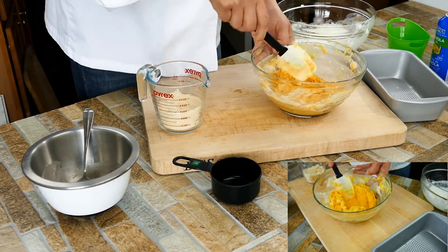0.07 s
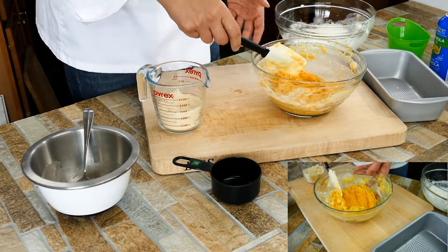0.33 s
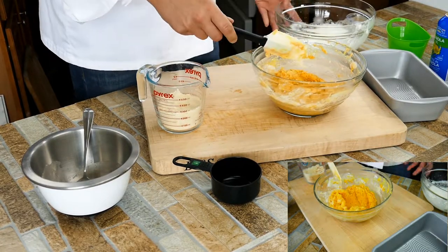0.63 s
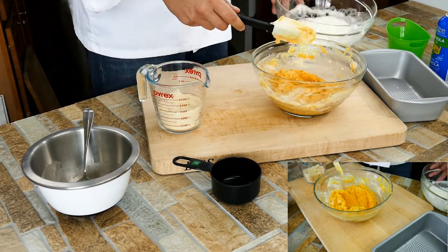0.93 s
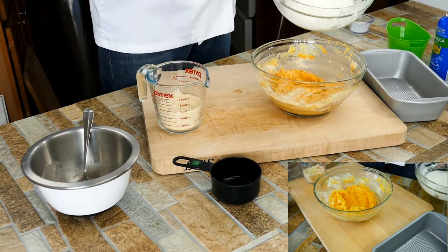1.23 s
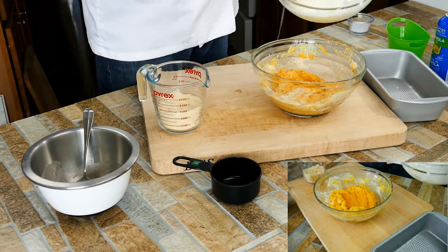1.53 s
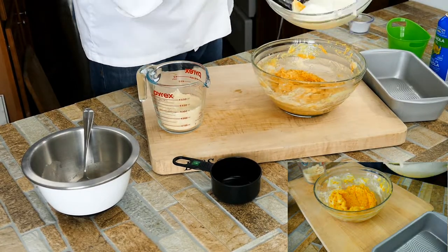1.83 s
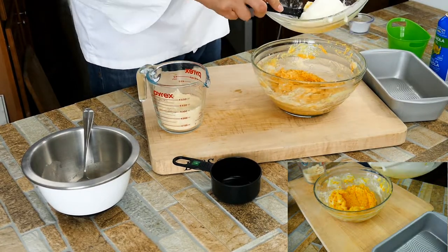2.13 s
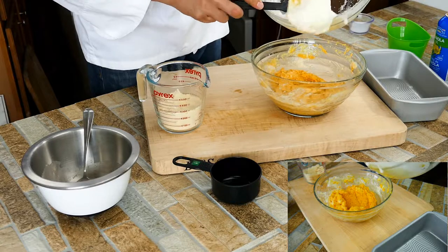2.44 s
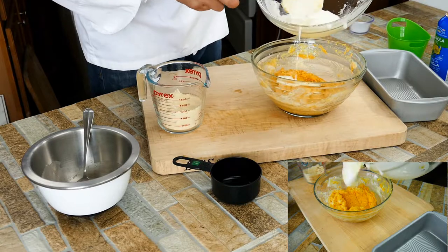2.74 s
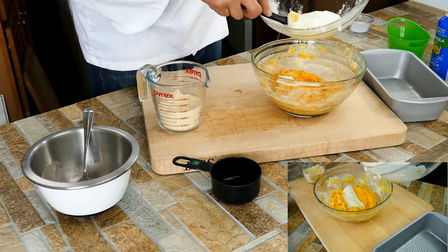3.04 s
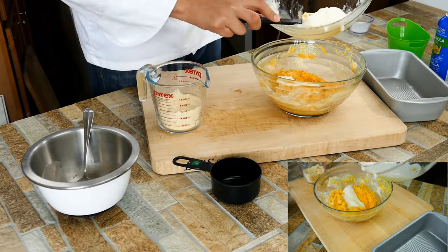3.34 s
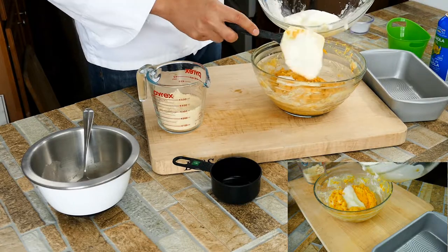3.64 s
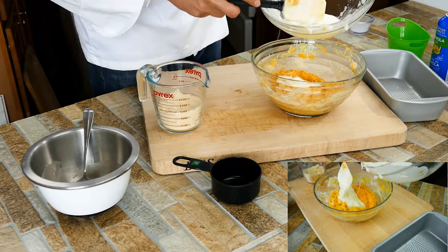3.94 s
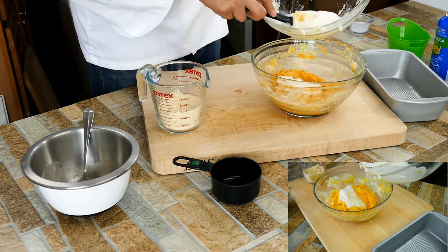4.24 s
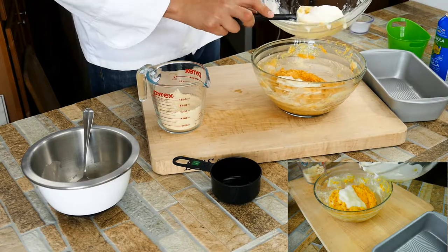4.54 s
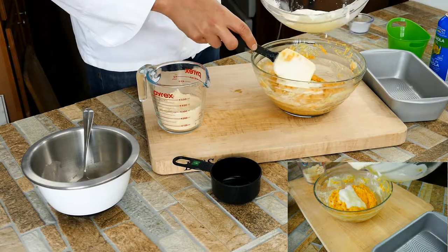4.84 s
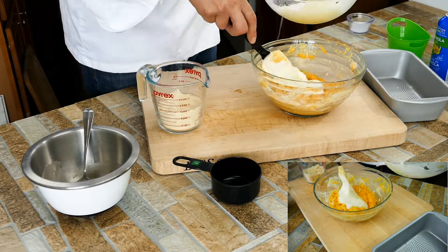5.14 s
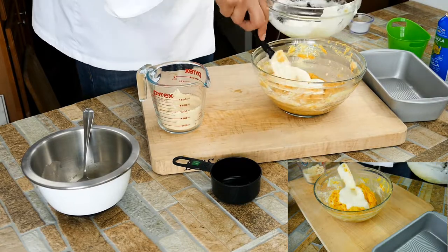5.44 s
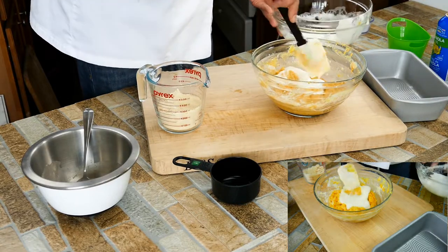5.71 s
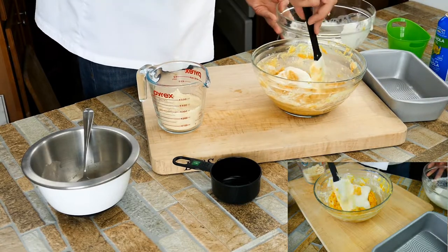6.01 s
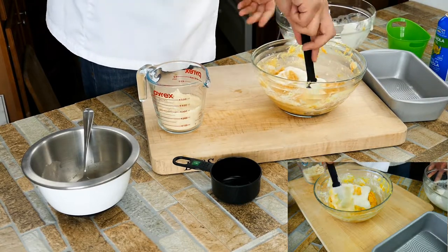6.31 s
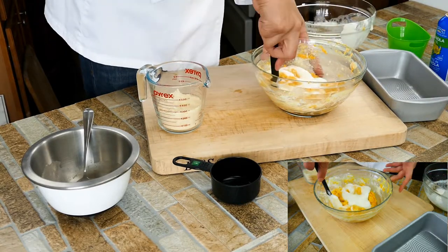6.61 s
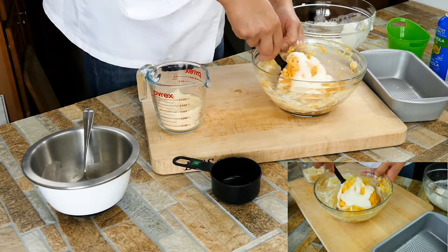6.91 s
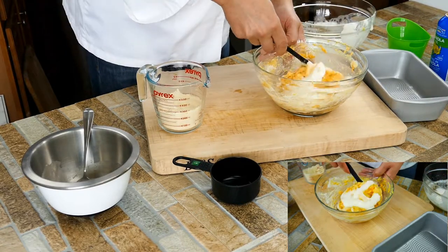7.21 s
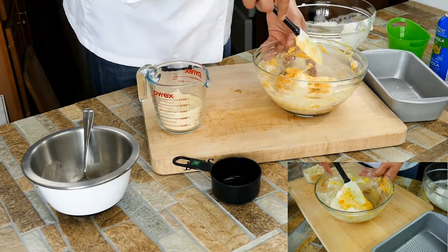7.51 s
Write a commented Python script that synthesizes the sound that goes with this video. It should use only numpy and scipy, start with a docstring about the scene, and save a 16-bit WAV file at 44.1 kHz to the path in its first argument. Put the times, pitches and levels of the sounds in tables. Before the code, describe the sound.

A low appliance hum with a soft rush of air runs throughout in a small, echoing kitchen. In the first second a spatula gives a faint, dull knock and smears softly through thick cream. A glass bowl drags briefly on the counter at 0.8 seconds, followed by soft handling bumps and a sharp, ringing clink at 1.4 seconds. From about 1.7 to 2.7 seconds come a light tap, short rubs on the glass and wet smears. A clink and a hollow knock sound near 3 seconds, then a cluster of ringing knocks, a clink and a rub between 3.9 and 4.4. Faint smears follow. At 5.9 seconds the bowl hits the counter with a bump, the loudest sound, whose echo lingers briefly. From 6.4 to about 7.5 seconds, wet batter is folded quietly with tiny popping air pockets.

```python
"""An appliance hums all the while in a small, live kitchen. A spatula knocks dully on a glass bowl
and smears through thick cream. The cook lifts the bowl, which drags briefly on the counter.
As the cream is scraped out, the spatula clinks, rubs and knocks on the glass and makes it ring.
The bowl is set down with a loud bump whose echo lingers briefly, then dies away. Last, the spatula
folds wet batter in a second bowl, and little air pockets pop."""
import sys
import numpy as np
from scipy import signal
from scipy.fft import rfft, irfft, next_fast_len
from scipy.io import wavfile

SR = 44100
rng = np.random.default_rng(int(sys.argv[2]) if len(sys.argv) > 2 else 0)


def unload_audio(sound):
    """Save the sound as a 16-bit wav file, at the path given as the first command line argument."""
    columns = np.transpose(np.atleast_2d(sound))
    # keep every value between -1 and 1, then stretch to whole-number steps
    steps = np.round(np.clip(columns, -1, 1) * 32767)
    wavfile.write(sys.argv[1], SR, steps.astype(np.int16))


N = 337806
TIME = np.arange(N) / SR
HIT_TIME = TIME[:SR]  # one second, the space given to each blow

# Levels in the tables are relative. A fade time is how long a sound takes to drop by 60 dB.
# The kitchen's echo. Each row: frequency in Hz, fade time in seconds.
ROOM_FADE = [(100, 1), (400, 0.48), (750, 0.61), (1500, 0.45), (4000, 0.44), (8000, 0.48), (14000, 0.17)]
# How alike left and right are. Each row: frequency in Hz, likeness (1 means the same).
EAR_LIKENESS = [(50, 0.97), (300, 0.99), (600, 0.88), (1200, 0.65), (4000, 0.75), (8000, 0.66),
                (13000, 0.4)]
# The motor's tones. Each row: pitch in Hz, level in dB.
MOTOR_TONES = [(119.6, -57), (139.6, -56.5)]
# The rush of air. Each row: frequency in Hz, level in dB.
AIR_COLOUR = [(25, -64), (60, -21), (90, -19), (130, -2.5), (170, -10), (250, -9), (450, -5), (740, -8),
              (1000, -14), (1900, -20.5), (2300, -25), (5000, -31), (10000, -39), (15300, -51.5)]
# Pitches that stand out of the rush. Each row: centre in Hz, width in Hz, boost in dB.
AIR_PEAKS = [(257.5, 41, 6.5), (406, 51, 4), (744.6, 8.2, 9.5), (1930, 32, 7.5)]
# Knocks on the rim. Each row: start in seconds, knock level in dB, ring level in dB,
# tilt towards treble in dB per octave, seconds until the ring drops away.
KNOCKS = [(.160, -44, -53, -12.5, 0.033), (2.964, -30.5, -35.5, -1.5, 0.094),
          (3.929, -23.5, -24, 0.5, 0.13), (4.2292, -29.5, -30.5, 0, 0.068), (4.3173, -32.5, -38, 0.5, 0.13)]
# The hollow sound of a knock. Each row: frequency in Hz, level in dB.
KNOCK_COLOUR = [(50, -48), (110, -41), (210, -9.5), (400, -4.5), (750, -5.5), (1250, -3.5), (1900, -7),
                (2300, -14.5), (2650, -6.5), (3000, -27), (4400, -37), (7000, -31), (10000, -33),
                (15000, -57)]
# Pitches that stand out of a knock. Each row: centre in Hz, width in Hz, boost in dB.
KNOCK_PEAKS = [(482.5, 5.6, 15.5), (653, 140, 12), (760, 36, 14.5), (1125, 83, 2), (1280, 135, 11.5),
               (1686, 49, 3), (1865, 67, 11.5), (3710, 99, 24.5), (4740, 120, 23), (6150, 510, 9.5),
               (7360, 180, 8), (8600, 180, 7), (10200, 250, 6), (11200, 200, 7), (12600, 200, 7)]
# The rim's ringing tones. Each row: pitch in Hz, level in dB, fade time in seconds.
RIM_TONES = [(1081, -1, 0.46), (1245, -1, 0.33), (1714, -5.5, 0.28), (2590, -6, 8.7), (2664, -5.5, 0.15),
             (3690, -24, 0.89), (4940, -23.5, 0.25), (6000, -22.5, 0.33), (7580, -28, 0.32),
             (9970, -26, 0.1)]
# Strokes through cream and batter. Each row: firmest moment in seconds, length in seconds,
# level in dB, extra fizz in dB.
SMEARS = [(.17, .17, -49.5, -10.5), (.41, .09, -57.5, -13), (0.676, .1, -51, -7.5),
          (0.78, 0.05, -54.5, 5.5), (1.092, .08, -49.5, -12), (2.364, 0.072, -57, -9),
          (2.643, .045, -43, -12), (4.816, 0.027, -55, -3), (5.06, 0.13, -61, -7),
          (5.382, 0.058, -54, -6.5), (6.452, 0.17, -53, -6), (6.577, 0.041, -51, -15),
          (6.66, 0.11, -53.5, -10), (6.88, 0.2, -51.5, -7), (7.178, 0.29, -63.5, 10),
          (7.4, 0.095, -61.5, 8)]
# The body of a smear, then its high fizz. Each row: frequency in Hz, level in dB.
SMEAR_COLOUR = [(600, -1), (1500, 6), (3000, 3), (5000, -2.5), (8000, -9), (15000, -22)]
FIZZ_COLOUR = [(3000, 1.5), (6500, 6), (10300, 2.5), (12500, -8), (15000, -17)]
# The bowl sliding on the counter. Each row: frequency in Hz, level in dB.
DRAG_COLOUR = [(60, -50), (110, -13), (250, -9), (350, -2.5), (480, -1), (620, -10), (760, -6.5),
               (920, -14), (1100, -9.5), (1700, -21.5), (2400, -23), (5400, -32), (9000, -50), (15000, -67)]
# Pitches that stand out of the slide. Each row: centre in Hz, width in Hz, boost in dB.
DRAG_PEAKS = [(348, 38, 5), (760, 23, 11.5), (1070, 70, 1), (1390, 69, 7), (2340, 120, 7.5), (5540, 96, 2),
              (6800, 160, 12), (8900, 160, 3), (10150, 160, 10)]
# Soft bumps of the hand on the bowl. Each row: start in seconds, level in dB, length in seconds.
HAND_BUMPS = [(1.256, -44.5, 0.06), (1.302, -46.5, 0.053)]
# Air pockets popping. Each row: start in seconds, level in dB, centre in Hz.
POPS = [(1.06, -53, 2790), (2.627, -57, 3600), (4.7955, -54.5, 9500), (6.370, -61, 9800), (6.57, -55, 2560),
        (6.650, -48, 3130), (6.668, -50.5, 2820), (7.160, -55, 10300), (7.279, -54, 9550),
        (7.361, -53, 4280)]
# Clinks on the held bowl. Each row: start in seconds, level in dB, tilt towards treble in dB
# per octave, boost of the bright tones in dB, clatter level in dB.
CLINKS = [(1.434, -18.5, -0.97, -0.5, -4.5), (1.74, -41.5, 0.4, 6.5, 2.5), (2.9358, -27, 0, 5, 4.5),
          (4.157, -27, 0, 2.5, 0)]
# The held bowl's ringing tones. Each row: pitch in Hz, level in dB, fade time in seconds.
GLASS_TONES = [(382.3, -6, 0.31), (891, -2.5, 0.37), (946, -1.5, 0.48), (1090, -7, 0.47), (1660, 3, 0.37),
               (2514, -6, 0.33), (2560, 2, 0.31), (3520, -7.5, 0.51), (3570, 1.5, .3), (4643, -4, 0.35),
               (5860, -9.5, 0.27), (6450, -37, 0.18), (6890, -19, 0.25), (7160, -9, 0.29),
               (7730, -23, 0.24), (8620, -13.5, 0.32), (9700, -27, 0.26), (10100, -20.5, 0.26),
               (10400, -45, 0.21), (11660, -27, 0.25), (12410, -40, .25)]
# A clink's first crack, then its clatter. Each row: frequency in Hz, level in dB.
CRACK_COLOUR = [(200, -23), (1000, -3), (2000, -3.5), (2800, 8.5), (3600, -12), (4600, -19), (7000, -12),
                (12000, -28), (15000, -45)]
CLATTER_COLOUR = [(60, -24), (200, -9.5), (400, -2), (1100, -1.5), (2000, -9), (3200, -9.5), (4200, -12),
                  (7000, -20), (10000, -28), (15000, -57)]
# Rubs along the glass. Each row: firmest moment in seconds, length in seconds, level in dB,
# favoured pitch in Hz.
RUBS = [(1.888, .04, -49, 2480), (1.986, 0.13, -59.5, 3430), (2.226, 0.037, -41, 980),
        (2.252, 0.031, -47.5, 3500), (2.28, 0.022, -47, 1660), (3.239, 0.15, -56, 2870),
        (4.346, 0.086, -38.5, 1670)]
# The bowl hitting the counter. Each row: start in seconds, level in dB, decay in seconds,
# tilt towards treble in dB per octave.
LANDING_HITS = [(5.8704, -10, 0.018, 2), (5.8769, -3, 0.0019, -3.5)]
# The thud of the counter. Each row: frequency in Hz, level in dB.
COUNTER_COLOUR = [(30, -57), (60, -24), (90, -44), (133, -9), (180, -12.5), (320, -6.5), (420, -8),
                  (700, -2), (1100, -7.5), (2400, -18.5), (4000, -28.5), (7000, -39), (10500, -52.5),
                  (15000, -74)]
# Where bowl and counter ring together. Each row: centre in Hz, width in Hz, boost in dB.
COUNTER_PEAKS = [(139, 11, -2.5), (336, 34, 2.5), (587, 15, 5), (710, 46, 5.5), (805, 25, 8.5),
                 (1420, 90, 7.5), (1740, 89, 4.5), (2380, 130, 7.5), (2710, 55, 6.5), (2930, 62, 6),
                 (3870, 42, 9), (4610, 29, 11)]
# The microphone's tone. Each row: frequency in Hz, boost or cut in dB.
MICROPHONE = [(30, -20), (55, -2.5), (85, 0), (110, -0.5), (7400, 0.5), (8200, -2.5), (9000, 2.5),
              (13000, 5), (15500, 3)]


def amp(db):
    """Turns decibels into a number to multiply by."""
    return 10 ** (np.asarray(db) / 20)


def unit(x):
    """Scales a signal to an average strength (rms) of 1."""
    return x / np.sqrt(np.mean(x ** 2) + 1e-20)


def read(points, hz):
    """Reads between a table's rows, with the frequencies spaced by octaves."""
    f, value = np.transpose(points)
    return np.interp(np.log(hz + 1), np.log(f + 1), value)


def add(mix, s, sound):
    """Mixes a sound in, starting at s seconds."""
    part = mix[:, round(s * SR):][:, :sound.shape[-1]]
    part += sound[..., :part.shape[1]]


def colour(points, peaks=()):
    """How strong each frequency is: a smooth curve with peaks on top."""
    def gain(hz):
        lift = sum((amp(db) ** 2 - 1) / (1 + (2 * (hz - f) / w) ** 2) for f, w, db in peaks)
        return amp(read(points, hz)) * np.sqrt(np.maximum(1 + lift, 1))
    return gain


def tilted(gain, tilt_db):
    """Tips a colour towards the treble by tilt_db an octave, pivoting near 1000 Hz."""
    return lambda hz: gain(hz) * amp(tilt_db * np.log2((hz + 50) / 1000))


def shape(x, gain):
    """Gives a sound a colour, without letting anything sound before its cause."""
    size = 2 * next_fast_len(x.shape[-1] // 2 + 2048)
    hz = np.fft.rfftfreq(size, 1 / SR)
    cepstrum = irfft(np.log(np.maximum(gain(hz), 1e-5)))
    cepstrum[1:size // 2] *= 2  # fold the filter's early half onto its late half
    cepstrum[size // 2 + 1:] = 0
    return irfft(rfft(x, size) * np.exp(rfft(cepstrum)), size)[..., :x.shape[-1]]


def spread(pair, gain):
    """Colours two unrelated signals and blends them into a partly alike left and right."""
    mid = shape(pair[0], lambda hz: gain(hz) * np.sqrt(1 + read(EAR_LIKENESS, hz)))
    side = shape(pair[1], lambda hz: gain(hz) * np.sqrt(1 - read(EAR_LIKENESS, hz)))
    return unit(np.array([mid + side, mid - side]))


def noise(gain, size):
    """Stereo noise with a given colour."""
    return spread(rng.standard_normal((2, size)), gain)


def wander(rate_hz, size):
    """A smooth random wobble; a higher rate makes it quicker."""
    hz = np.fft.rfftfreq(size, 1 / SR)
    return unit(irfft(rfft(rng.standard_normal(size)) * np.exp(-(hz / rate_hz) ** 2), size))


def appliance(rush_db=-46.5):
    """Two motor tones beat against each other over a steady rush of air."""
    hum = np.zeros(N)
    for hz, db in MOTOR_TONES:
        drift = .15 * wander(3, N)
        hum += amp(db) * np.sqrt(2) * np.sin(2 * np.pi * hz * TIME + drift)
    air = colour(AIR_COLOUR, AIR_PEAKS)
    rumble_cut = colour([(60, 0), (100, -7), (145, -7), (200, 0)])
    return hum + amp(rush_db) * noise(lambda hz: air(hz) * rumble_cut(hz), N)


def crack(gain):
    """The first few milliseconds of a blow, straight from the glass."""
    burst = rng.standard_normal((2, SR)) * np.exp(-HIT_TIME / .002)
    return spread(burst, gain) * np.sqrt(.001)


def echoes(gain, hold_s=0):
    """The crowded echoes of one blow; after the hold, each frequency dies at the room's speed."""
    hz, t, bands = signal.stft(noise(gain, SR), SR, nperseg=256)
    fade = amp(-60 * np.maximum(t - hold_s, 0) / read(ROOM_FADE, hz)[:, None])
    tail = signal.istft(bands * fade, SR, nperseg=256)[1][:, :SR]
    return tail * (1 - np.exp(-HIT_TIME / 0.00017))


def ring(tones, waver):
    """Dying tones of glass; echoes make each one waver and reach the two ears out of step."""
    out = np.zeros((2, SR))
    for hz, db, fade_s in tones:
        phase = 2 * np.pi * rng.random() + 0.36 * rng.standard_normal((2, 1))
        flutter = 1 + waver * (wander(32, SR) + 1j * wander(62, SR))
        tone = np.exp(1j * (2 * np.pi * hz * HIT_TIME + phase))
        out += amp(db - 60 * HIT_TIME / fade_s) * (flutter * tone).real
    return out * (1 - np.exp(-HIT_TIME / 0.0013))


def knocks(crack_db=5, drop_db=14, drop_s=0.031, fade_db_per_s=90):
    """The spatula gives a hollow knock; the rim sings on briefly, then drops away quickly."""
    out = np.zeros((2, N))
    early_boost = 1 + amp(-2) * np.exp(-HIT_TIME / 0.05)
    for s, knock_db, ring_db, tilt_db, sing_s in KNOCKS:
        body = tilted(colour(KNOCK_COLOUR, KNOCK_PEAKS), tilt_db)
        knock = echoes(body) * early_boost + amp(crack_db) * crack(body)
        late_s = np.maximum(HIT_TIME - sing_s, 0)
        loss_db = drop_db * (1 - np.exp(-late_s / drop_s)) + fade_db_per_s * late_s
        add(out, s, amp(knock_db) * knock + amp(ring_db - loss_db) * ring(RIM_TONES, waver=0.41))
    return out * amp([[-0.23], [0.23]])  # left, right


def swell(s, attack_s, hold_s, release_s):
    """A loudness curve that grows up to time s, holds, then dies away."""
    early, late = np.maximum(s - TIME, 0), np.maximum(TIME - s - hold_s, 0)
    return np.exp(-np.minimum(early / attack_s + late / release_s, 30))


def stroke(s, length):
    """The pressure of one stroke of the spatula."""
    return swell(s, attack_s=0.49 * length, hold_s=0.21 * length, release_s=0.76 * length)


def crackle(gain, per_s, uneven_db):
    """Countless tiny wet snaps of uneven size."""
    sizes = amp(uneven_db * np.minimum(rng.exponential(1, (2, N)), 4)) * rng.standard_normal((2, N))
    snaps = rng.random((2, N)) < per_s / SR
    return spread(sizes * snaps, gain)


def smears(body_db=-3, fizz_db=-2.5, lumps_db=2):
    """Cream and batter smear and tear in lumps under the blade."""
    body = crackle(colour(SMEAR_COLOUR), per_s=4600, uneven_db=0)
    body *= amp(body_db + lumps_db * wander(30, N))
    fizz = crackle(colour(FIZZ_COLOUR), per_s=7000, uneven_db=2)
    fizz *= amp(fizz_db + lumps_db * wander(50, N))
    body_power, fizz_power = np.zeros((2, N))
    for s, length, db, extra_fizz_db in SMEARS:
        power = (amp(db) * stroke(s, length)) ** 2
        body_power += power
        fizz_power += power * amp(extra_fizz_db) ** 2
    return body * np.sqrt(body_power) + fizz * np.sqrt(fizz_power)


def lifting(drag_s=0.7734, drag_db=-29.5):
    """The bowl's foot slides over the counter; low bumps follow as it is taken in hand."""
    slide = swell(drag_s, attack_s=0.015, hold_s=0.048, release_s=0.063)
    out = amp(drag_db) * slide * noise(colour(DRAG_COLOUR, DRAG_PEAKS), N)
    thud = colour([(30, -22), (70, -6), (110, -3), (200, -4), (500, -43), (2000, -80)])
    for s, db, length in HAND_BUMPS:
        window = signal.windows.hann(round(length * SR))
        push = noise(thud, SR)[:, :len(window)]
        add(out, s, amp(db) * unit(push) * window)
    return out


def pops(decay_s=0.013, width_octaves=.55, room_db=-9):
    """Air pockets burst in the batter, each with a faint echo."""
    out = np.zeros((2, N))
    burst = np.exp(-HIT_TIME / decay_s) + amp(room_db)
    for s, db, centre_hz in POPS:
        pocket = lambda hz: 1 / (1 + (np.log2((hz + 1) / centre_hz) / width_octaves) ** 2) ** 2
        add(out, s, amp(db) * echoes(pocket) * burst)
    return out


def clinks(crack_db=7.5, ring_db=-6.5, bright_hz=3550, bright_width_hz=470):
    """The hard handle strikes the glass: a crack, ringing tones and a short clatter around them."""
    out = np.zeros((2, N))
    body = colour(CLATTER_COLOUR, [(hz, 80, 17) for hz, _, _ in GLASS_TONES if hz > 1500])
    early = 1 + amp(5) * np.exp(-((HIT_TIME - 0.012) / 0.0065) ** 2)  # counter and walls answer first
    bloom = 1 - np.exp(-HIT_TIME / 0.0061)  # the echoes build up after the crack
    for s, db, tilt_db, bright_db, clatter_db in CLINKS:
        clatter = echoes(body) * early * bloom + amp(crack_db) * crack(colour(CRACK_COLOUR))
        sound = amp(ring_db) * ring(GLASS_TONES, waver=0.81) + amp(clatter_db) * clatter
        # where the blow lands decides how strongly the bright tones answer
        place = lambda hz: amp(bright_db * np.exp(-((hz - bright_hz) / bright_width_hz) ** 2))
        add(out, s, amp(db) * shape(sound, tilted(place, tilt_db)))
    return out * amp([[-3], [-2.5]])  # left, right


def rubbing(width_hz=22, raise_hz=22.3, grit_db=2, favour_db=6, favour_octaves=0.16, top_hz=5000):
    """The rubbing blade makes the bowl's tones sing, most of all near the pitch each rub favours."""
    singing = [(hz, db) for hz, db, _ in GLASS_TONES[2:]]
    lowest_hz, lowest_db = singing[0]
    singing[0] = (lowest_hz + raise_hz, lowest_db)  # the blade's pressure raises the lowest tone
    def bowl(hz):
        peaks = sum(amp(db) / (1 + (2 * (hz - f) / width_hz) ** 2) for f, db in singing)
        return peaks / (1 + (hz / top_hz) ** 4)
    out = np.zeros((2, N))
    for s, length, db, favoured_hz in RUBS:
        def grip(hz):
            octaves_away = abs(np.log2((hz + 1) / favoured_hz))
            return amp(favour_db * np.exp(-(octaves_away / favour_octaves) ** 2) - 4 * octaves_away)
        song = noise(lambda hz: bowl(hz) * grip(hz), SR) * amp(db + grit_db * wander(43, SR))
        start = s - .5
        add(out, start, song * stroke(s, length)[round(start * SR):][:SR])
    return out


def landing(tail_db=-19, hold_s=0.16, fade_db_per_s=22):
    """The bowl hits the counter: a loud bump whose echo nearly holds level briefly, then dies away."""
    out = np.zeros((2, N))
    body = colour(COUNTER_COLOUR, COUNTER_PEAKS)
    for s, db, decay_s, tilt_db in LANDING_HITS:
        contacts = rng.standard_normal((2, SR)) * np.exp(-(HIT_TIME / decay_s) ** 2)
        add(out, s, amp(db) * np.sqrt(decay_s) * spread(contacts, tilted(body, tilt_db)))
    tail = amp(tail_db - fade_db_per_s * HIT_TIME) * echoes(body, hold_s)
    add(out, LANDING_HITS[0][0], tail)
    return out * amp([[-0.3], [0.3]])  # left, right


def scene():
    """All the kitchen's sounds added together."""
    return appliance() + knocks() + smears() + lifting() + pops() + clinks() + rubbing() + landing()


def record(dry):
    """The microphone rounds off loud peaks, adds its own tone and loses the highest treble."""
    coloured = shape(np.tanh(dry), colour(MICROPHONE))
    treble_cut = signal.firwin(511, 15500, window=("kaiser", 9), fs=SR)
    return signal.oaconvolve(coloured, treble_cut[None], "same")


dry = scene()
out = record(dry)
unload_audio(out)
```